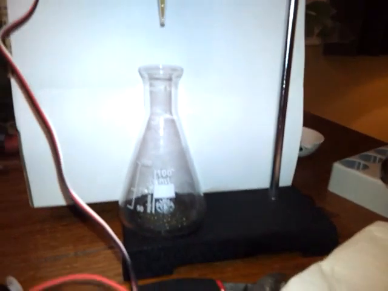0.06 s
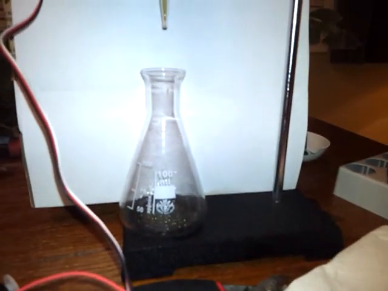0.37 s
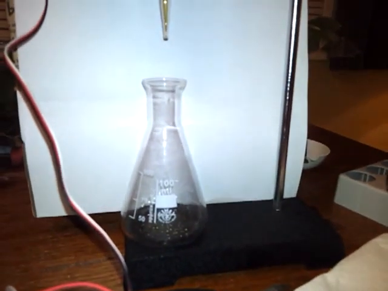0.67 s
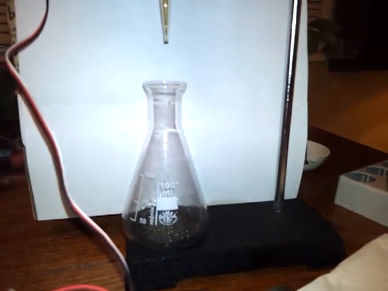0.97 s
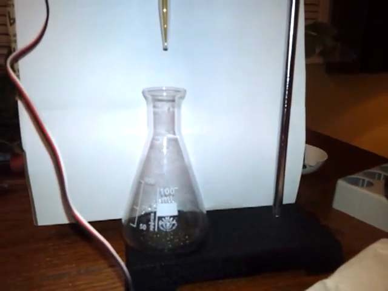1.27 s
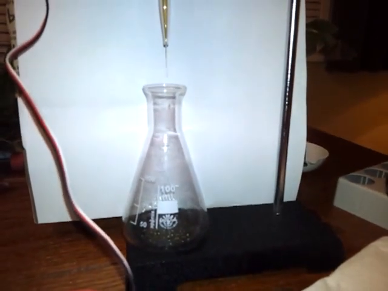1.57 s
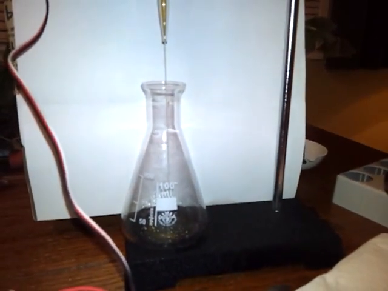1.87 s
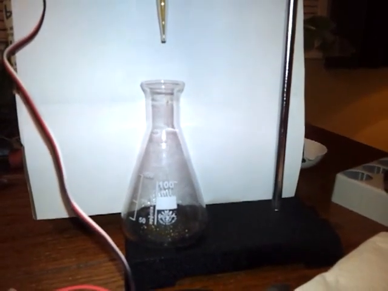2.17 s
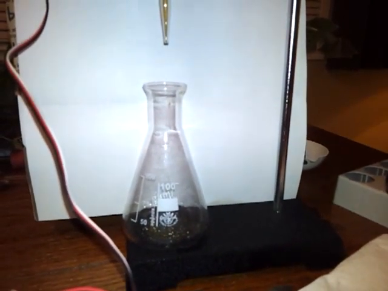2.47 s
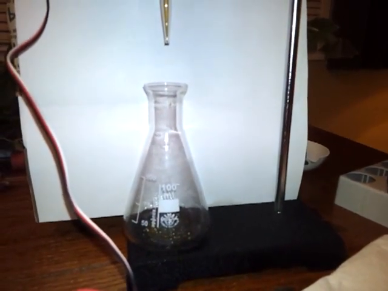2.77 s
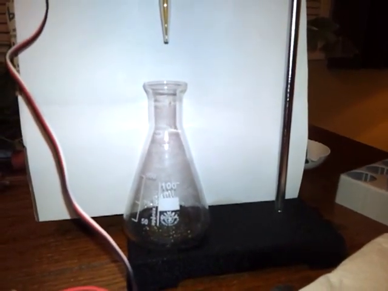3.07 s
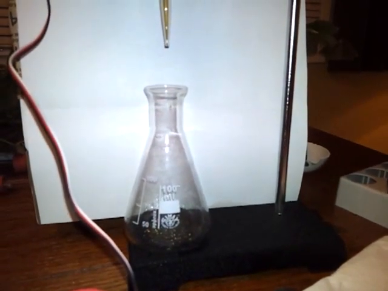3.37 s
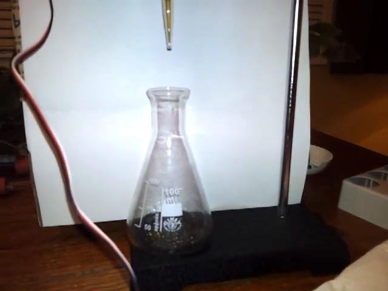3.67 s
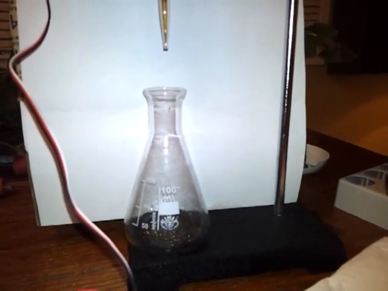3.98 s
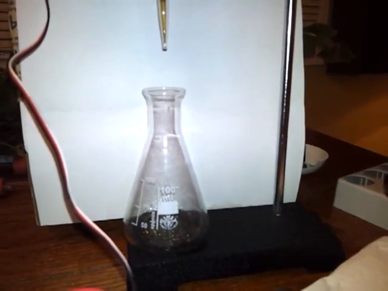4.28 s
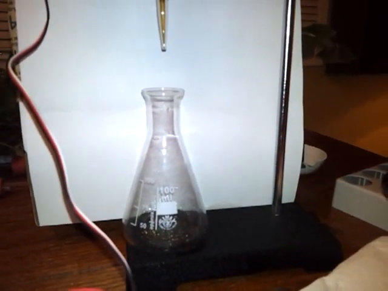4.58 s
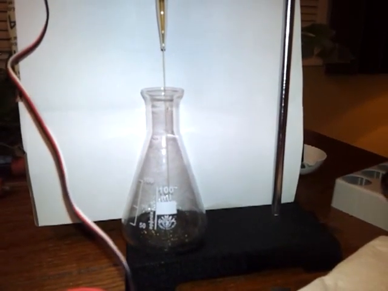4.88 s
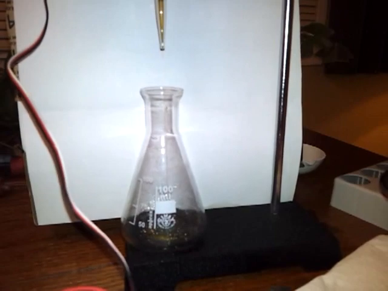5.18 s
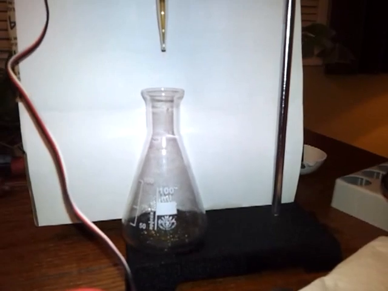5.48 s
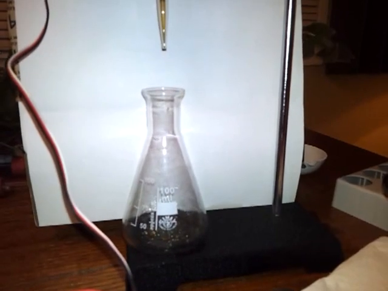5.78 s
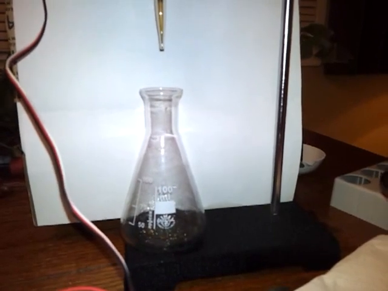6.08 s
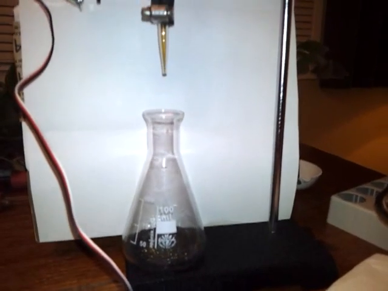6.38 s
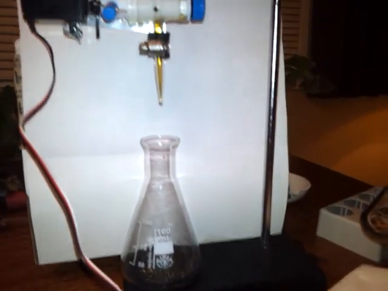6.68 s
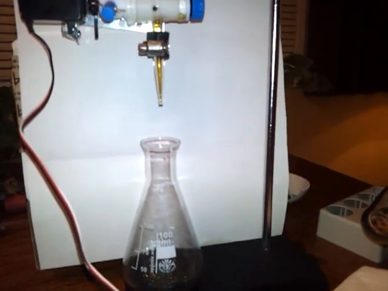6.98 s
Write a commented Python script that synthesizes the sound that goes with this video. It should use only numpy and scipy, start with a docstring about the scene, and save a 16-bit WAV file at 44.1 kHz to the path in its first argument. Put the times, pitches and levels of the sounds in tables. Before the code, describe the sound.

A button clicks, then a small servo whirs a burette's stopcock open and shut; this happens twice over faint room hiss.

```python
"""Servo-driven burette on a workbench

A small, quiet room with a steady hiss; one microphone close to the bench. A push button clicks, and a
hobby servo swings the stopcock of a burette open and shut; this happens twice. The gear teeth rattle in
the servo's plastic case with a faint whine, the stand rings with soft knocks, and each time a short
squirt of liquid stirs up bubbles in a glass flask."""
import sys
import numpy as np
from scipy import signal
from scipy.fft import rfft, irfft
from scipy.io import wavfile

SR = 44100
rng = np.random.default_rng(int(sys.argv[2]) if len(sys.argv) > 2 else 0)


def store_wav(level_fs):
    """Save 16-bit WAV to argv[1]."""
    pcm = np.round(np.clip(np.atleast_2d(level_fs), -1, 1) * 32767)
    wavfile.write(sys.argv[1], SR, pcm.T.astype(np.int16))


N = 310508
TIME = np.arange(N) / SR

# Spectrum of the room tone. Each row: frequency in Hz, relative density in dB.
ROOM_TONE = [(15, -37.5), (25, -4), (91, -1), (124, 0), (314, -2), (386, -2), (475, -4), (555, -4.5),
             (682, -4), (797, -5), (1240, -7.5), (1870, -9.5), (11100, -14.5), (12000, -15.5),
             (15600, -55.5), (22000, -120)]
# Liquid running into the flask. Each row: start in seconds, stop in seconds, level in dB.
SQUIRTS = [(1.72, 1.936, -57), (4.974, 5.20, -56.5)]
# The servo rocking the stand. Each row: time in seconds, strength in dB.
STAND_KNOCKS = [(1.600, -44.5), (1.645, -40.5), (1.734, -33), (4.888, -41.5), (4.968, -45)]
# Modes of the burette in its clamp, of the bench and of the button.
# Each row: frequency in Hz, gain in dB, time to fall by 60 dB in seconds.
CLAMP_MODES = [(338, 1.5, 0.18), (454, 4, .05), (526, -9, .04), (674, -10, 0.025), (820, 0, 0.071),
               (930, -27, 0.0327), (1086, -17.5, .04)]
BENCH_MODES = [(318.4, -2.5, 0.13), (490, -31, .05), (615, -7.5, 0.048), (715, -21, 0.079),
               (1067, -11, 0.065)]
BUTTON_MODES = [(632, -34, 0.016), (1020, -54, 0.0082), (2150, -29, 0.0097), (2317, -7.5, 0.012),
                (2350, -16, 0.0063), (2990, -22, 0.0066), (3890, -21.5, 0.012), (5340, -15, 0.0046),
                (6620, -12.5, 0.0071), (7260, -3.5, 0.0026), (8240, -9.5, 0.0067), (9300, -16, 0.0073),
                (11600, -14.5, 0.0049)]
# Presses and releases. Each row: time in seconds, snap in dB, its low-pass in Hz, bench thud in dB.
BUTTON_SNAPS = [(0.6302, -5, 10400, -37.5), (0.8215, -19, 1800, -37), (4.0004, -1.5, 11900, -40.5),
                (4.1894, -15.5, 1800, -39), (4.249, -18, 1800, -71)]
# Resonances of the servo case, one of them a dip. Each row: frequency in Hz, width in Hz, lift in dB.
CASE_RESONANCES = [(1498, 59, 20.5), (1694, 260, 4), (2087, 150, -18.5), (2293, 84, 9.5), (2775, 180, 4),
                   (3760, 245, 10.5), (4110, 130, 7), (4405, 120, 11), (5040, 300, 5), (5694, 380, 19),
                   (6066, 460, 14.5), (6350, 190, 2), (7500, 400, 5), (8700, 440, 8.5), (10220, 1600, 6)]
# Gear whine before the case colours it.
# Each row: multiple of the tooth rate, relative level in dB while opening, the same while shutting.
WHINE_OVERTONES = [(2, -13, -17), (3, -18.5, -24), (4, -25.5, -26), (5, -36, -16.5)]
# Servo swings, opening and shutting in turn. Each row: start in seconds, stop in seconds,
# tooth rate at full speed in Hz, level in dB, jolt in dB as the play is taken up.
SWINGS = [(1.491, 1.727, 1893, -15, -33), (1.847, 2.097, 1788, -14.5, -21.5),
          (4.736, 4.972, 1929, -14.5, -28), (5.085, 5.339, 1782, -14.5, -25)]

PINION_TEETH = 5
# The gears grow louder as they gather speed; after the stop they fade fast, then coast out faintly.
ATTACK_S, START_DB, SWELL_S = .004, -16.5, 0.05
BRAKE_DB_PER_S, COAST_DB, COAST_DB_PER_S = 948, -19.5, 164
# The teeth catch shortly after each start, then run slack for a moment.
TAKE_UP_AFTER_S, TAKE_UP_S, SLACK_S, SLACK_DB = .010, 0.0068, 0.015, -2
# Shutting, the stopcock passes a tight spot, the servo eases off, and the gears bounce in their play.
TIGHT_AFTER_S, TIGHT_S, TIGHT_DB = .152, 0.0082, -2
EASE_S, EASE_DB = 0.066, -3.5
REBOUND_AFTER_S, REBOUND_GAP_S, REBOUND_S, REBOUND_DB, REBOUND_LOSS_DB = 0.0214, .013, 0.0055, -8.5, 3.5


def from_db(db):
    """Decibels to gain."""
    return 10 ** (np.asarray(db) / 20)


def rms_one(x):
    """Scale to unit rms."""
    return x / np.sqrt(np.mean(x ** 2) + 1e-20)


def butter(x, hz, kind, order=2):
    """Causal low- or high-pass."""
    return signal.sosfilt(signal.butter(order, hz, kind, fs=SR, output="sos"), x + 1e-18)


def drift(rate_hz):
    """A slow random wander of unit rms."""
    knots = rng.standard_normal(N // 40)
    return rms_one(np.interp(TIME * rate_hz * 2, np.arange(len(knots)), knots))


def gate(start, stop, edge_s):
    """Rises to one from start and falls to zero from stop."""
    return np.clip((TIME - start) / edge_s, 0, 1) * np.clip((stop - TIME) / edge_s + 1, 0, 1)


def taps(rows):
    """One click for each (seconds, dB)."""
    clicks = np.zeros(N)
    for at, db in rows:
        clicks[round(at * SR)] += from_db(db)
    return clicks


def settle(clicks, decay_s):
    """Each click becomes a step that dies away exponentially."""
    return signal.lfilter([1], [1, -np.exp(-1 / (decay_s * SR))], clicks + 1e-18)


def ring(clicks, modes):
    """Each click sets every (Hz, dB, t60) mode ringing as a damped sine."""
    ringing = 0
    for hz, db, t60 in modes:
        radius, angle = from_db(-60 / (t60 * SR)), 2 * np.pi * hz / SR
        feedback = [1, -2 * radius * np.cos(angle), radius * radius]
        ringing += signal.lfilter([0, from_db(db) * np.sin(angle)], feedback, clicks + 1e-18)
    return ringing


def ring_opposed(clicks, modes):
    """Ringing in which neighbouring modes swing in opposite directions."""
    return ring(clicks, modes[::2]) - ring(clicks, modes[1::2])


def room_tone(level_db):
    """The steady hiss of the room, strongest in the bass."""
    hz, db = np.transpose(ROOM_TONE)
    bin_hz = np.arange(N // 2 + 1) * SR / N
    gain = from_db(np.interp(np.log(bin_hz + 1), np.log(hz), db))
    return from_db(level_db) * rms_one(irfft(rfft(rng.standard_normal(N)) * gain, N))


def room(direct, t60, tail_db, echo_db, wall_hz):
    """The direct sound reaches the microphone with a soft echo off things nearby and a short tail."""
    t = TIME[:SR // 2]
    tail = rng.standard_normal(len(t)) * from_db(-60 * t / t60) * (t > .002)
    echo = rng.standard_normal(len(t)) * np.exp(-np.abs(t - .0098) / .003)
    response = from_db(tail_db) * tail / np.linalg.norm(tail)
    response += from_db(echo_db) * echo / np.linalg.norm(echo)
    return direct + signal.fftconvolve(direct, butter(response, wall_hz, "low", order=1))[:N]


def bass_bumps(snap_gain_db, swing_db, lag_s, settle_s, top_hz):
    """A small step of pressure settles slowly with each button snap and just after each swing."""
    with_snaps = [(at, db + snap_gain_db) for at, db, *_ in BUTTON_SNAPS]
    after_swings = [(stop + lag_s, swing_db) for _, stop, *_ in SWINGS]
    return -butter(settle(taps(with_snaps + after_swings), settle_s), top_hz, "low")


def squirt(bubbles_per_s, low_hz, high_hz, t60):
    """The thin jet stirs up many tiny bubbles in the flask, each ringing at one of eight pitches."""
    flow = sum(from_db(db) * gate(start, stop, 0.016) for start, stop, db in SQUIRTS)
    pitches = np.geomspace(low_hz, high_hz, 8)
    births = (rng.random(N) < bubbles_per_s / SR) * rng.standard_normal(N)
    pitch_index = rng.integers(0, len(pitches), N)
    bubbles = sum(ring(births * (pitch_index == k), [(hz, 0, t60)]) for k, hz in enumerate(pitches))
    return flow * rms_one(bubbles)


def stand(chatter, chatter_s):
    """Each knock makes the burette ring and chatter briefly in its clamp."""
    knocks = taps(STAND_KNOCKS)
    contacts = 0.5 * knocks + chatter * settle(knocks, chatter_s) * rng.standard_normal(N)
    return ring_opposed(contacts, CLAMP_MODES)


def button(crack_db, low_cut_hz):
    """The spring snaps over with a dry tick, and the push reaches the bench as a small thud."""
    snaps = sum(butter(taps([(at, db)]), top_hz, "low", order=1) for at, db, top_hz, _ in BUTTON_SNAPS)
    thuds = taps([(at, thud_db) for at, _, _, thud_db in BUTTON_SNAPS])
    tick = ring_opposed(snaps, BUTTON_MODES) + from_db(crack_db) * snaps
    return butter(tick, low_cut_hz, "high") + ring(thuds, BENCH_MODES)


def tooth_rate(spin_up_s, coast_s, wander):
    """The motor runs up to speed, wavers with the friction of the stopcock and coasts to rest."""
    rate_hz = np.zeros(N)
    for start, stop, full_hz, *_ in SWINGS:
        run_up = 1 - np.exp(-np.maximum(TIME - start, 0) / spin_up_s)
        coast = np.exp(-np.maximum(TIME - stop, 0) / coast_s)
        rate_hz += full_hz * run_up * coast
    return rate_hz * (1 + wander * drift(25))


def jolt(start, length_s, db, rise_s=0.00216, fall_db_per_s=1500):
    """Envelope of a brief burst of effort in the gears that dies away quickly."""
    rise = np.clip((TIME - start) / rise_s, 0, 1)
    return rise * from_db(db - fall_db_per_s * np.maximum(TIME - start - length_s, 0))


def gear_effort():
    """Loudness of the gears: each swing catches, swells and brakes; shutting adds three more jolts."""
    effort = np.zeros(N)
    for k, (start, stop, _, db, take_up_db) in enumerate(SWINGS):
        since_start, since_stop = np.maximum(TIME - start, 0), np.maximum(TIME - stop, 0)
        attack = np.minimum(since_start / ATTACK_S, 1)
        swell = from_db(START_DB * np.exp(-since_start / SWELL_S))
        caught = start + TAKE_UP_AFTER_S + TAKE_UP_S
        slack = from_db(SLACK_DB * gate(caught, caught + SLACK_S, .002))
        brake = from_db(-BRAKE_DB_PER_S * since_stop)
        coast = from_db(COAST_DB - COAST_DB_PER_S * since_stop)
        turning = from_db(db) * attack * swell * slack * np.maximum(brake, coast)
        jolts = jolt(start + TAKE_UP_AFTER_S, TAKE_UP_S, take_up_db)
        if k % 2:  # shutting
            turning *= from_db(EASE_DB * np.clip((TIME - stop) / EASE_S + 1, 0, 1))
            jolts += jolt(start + TIGHT_AFTER_S, TIGHT_S, db + TIGHT_DB)
            for n in range(2):
                rebound_at = stop + REBOUND_AFTER_S + n * REBOUND_GAP_S
                jolts += jolt(rebound_at, REBOUND_S, db + REBOUND_DB - n * REBOUND_LOSS_DB)
        effort += np.hypot(turning, jolts)
    return effort


def gear_whine(teeth_passed):
    """Overtones of the tooth rate; their balance shifts as other flanks meet on the way back."""
    opening = sum(gate(start, stop, .05) for start, stop, *_ in SWINGS[::2])
    whine = np.zeros(N)
    for multiple, open_db, shut_db in WHINE_OVERTONES:
        gain = from_db(shut_db + (open_db - shut_db) * opening)
        whine += gain * np.sqrt(2) * np.sin(2 * np.pi * multiple * teeth_passed)
    return whine


def gear_rattle(teeth_passed, impact_gain):
    """Teeth strike, slide and whine, and the plastic case rings with them; unit rms while running."""
    meetings = np.diff(np.floor(teeth_passed), prepend=0)
    impacts = meetings * rng.standard_normal(N) * np.sqrt(SR / SWINGS[0][2])
    sliding = rng.standard_normal(N) * (1 + 0.2 * np.cos(2 * np.pi * teeth_passed))
    meshing = impact_gain * impacts + sliding + gear_whine(teeth_passed)
    rattle = butter(meshing, 1904, "high", order=8)  # the small case radiates little bass
    for hz, width_hz, lift_db in CASE_RESONANCES:
        band = signal.lfilter(*signal.iirpeak(hz, hz / width_hz, fs=SR), rattle)
        rattle += (from_db(lift_db) - 1) * band
    rattle = butter(rattle, 14230, "low")
    running = sum(gate(start, stop, .005) for start, stop, *_ in SWINGS)
    return rattle / np.std(rattle[running > .5])


def rotor_hum(teeth_passed, hum_db, octave_db, flutter):
    """The rotor hums unsteadily, one cycle a turn and an octave above."""
    angle = 2 * np.pi * teeth_passed / PINION_TEETH + flutter * drift(32)
    fundamental = from_db(hum_db) * (1 + flutter * drift(40)) * np.sin(angle)
    octave = from_db(octave_db) * (1 + flutter * drift(13)) * np.sin(2 * angle)
    return fundamental + octave


def servo(rattle_db, throb_db):
    """Rattle and hum follow the speed of the motor and the effort of the gears."""
    teeth_passed = np.cumsum(tooth_rate(spin_up_s=.018, coast_s=.05, wander=.006)) / SR
    rattle = from_db(rattle_db) * gear_rattle(teeth_passed, impact_gain=0.77)
    throb = from_db(throb_db * drift(90))  # the gears are not quite round
    hum = rotor_hum(teeth_passed, hum_db=-36.5, octave_db=-45.5, flutter=0.3)
    return gear_effort() * (rattle * throb + hum)


def scene():
    """Everything stands on one bench, close to a single microphone."""
    bench = servo(rattle_db=0.3, throb_db=0.35)
    bench += button(crack_db=-8.5, low_cut_hz=110)
    bench += stand(chatter=0.053, chatter_s=0.0091)
    bench += squirt(bubbles_per_s=1300, low_hz=785, high_hz=1090, t60=.025)
    at_microphone = room(bench, t60=0.15, tail_db=-15, echo_db=-14.5, wall_hz=12000)
    at_microphone += bass_bumps(snap_gain_db=-41, swing_db=-42, lag_s=0.031, settle_s=0.049, top_hz=55.6)
    at_microphone += room_tone(level_db=-54.5)
    return at_microphone[None]


def record(dry):
    """The treble is cut steeply above 11750 Hz."""
    return signal.sosfilt(signal.ellip(12, .1, 80, 11750, fs=SR, output="sos"), dry)


dry = scene()
out = record(dry)
store_wav(out)
```